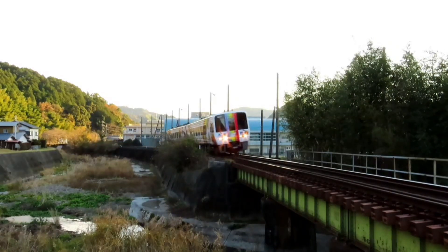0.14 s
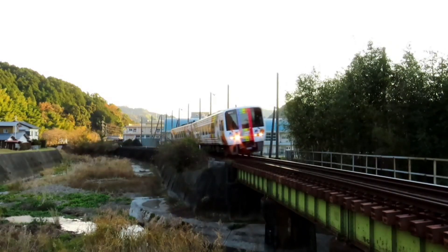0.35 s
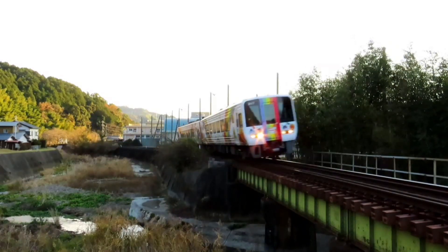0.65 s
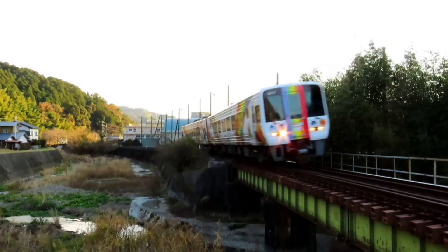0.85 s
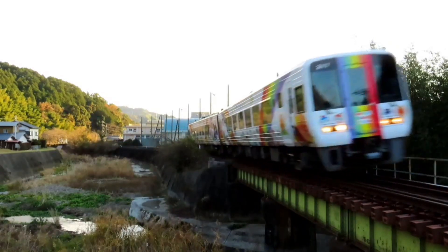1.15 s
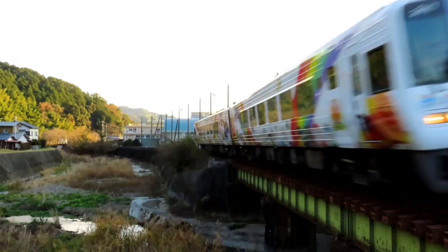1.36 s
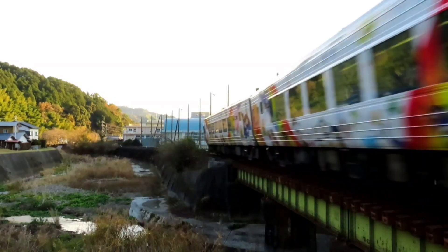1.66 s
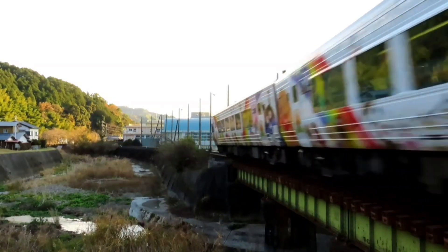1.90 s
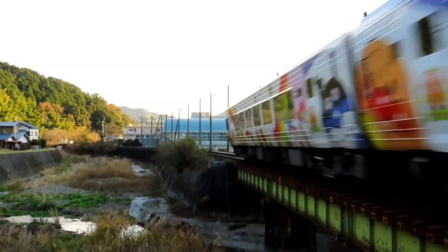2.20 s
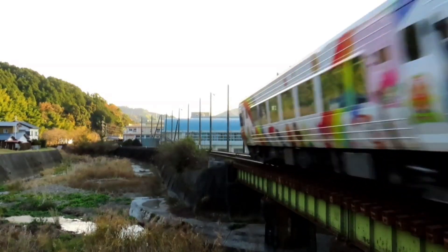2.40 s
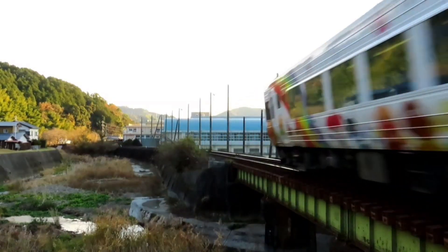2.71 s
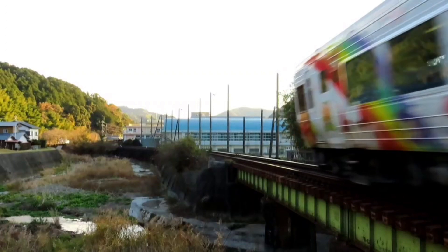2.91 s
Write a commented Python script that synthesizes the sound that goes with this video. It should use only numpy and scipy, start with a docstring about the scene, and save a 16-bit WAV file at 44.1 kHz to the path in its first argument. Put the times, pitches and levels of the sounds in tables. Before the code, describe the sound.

Diesel train rumbling across a steel bridge close by, with rhythmic wheel clacks.

```python
"""A diesel drone and a swelling steel roar: a railcar set runs onto a short girder bridge and
passes close by, off to the right. Rough rail shakes the girders under the rolling wheels, and
single modes sing out over the engine's low firing tones. Once a turn a wheel thumps the rail,
clacking and setting the girders ringing. A thin hiss sits on top. Two close microphones hear
the train with short echoes off banks and cars, and a limiter ducks the loudest blows."""
import sys
import numpy as np
from scipy import signal
from scipy.fft import rfft, irfft, next_fast_len
from scipy.io import wavfile
from scipy.ndimage import uniform_filter1d

SR = 44100
rng = np.random.default_rng(int(sys.argv[2]) if len(sys.argv) > 2 else 0)


def master(y):
    """Save y as 16-bit WAV."""
    cut = np.clip(np.atleast_2d(y).T, -1, 1)
    pcm = np.round(cut * 32767)  # scale
    wavfile.write(sys.argv[1], SR, pcm.astype(np.int16))


N = 134505
TIME_S = np.arange(N) / SR
OPPOSITE = np.array([[1], [-1]])   # left and right in opposite polarity


def amp(db):
    """Decibels to amplitude."""
    return 10 ** (np.asarray(db) / 20)


def unit_rms(x):
    """Scale to an RMS of one."""
    return x / np.sqrt(np.mean(x ** 2) + 1e-20)


def automation(rows):
    """One curve per column, gliding between rows that start with a time."""
    times, *columns = np.transpose(rows)
    return [np.interp(TIME_S, times, column) for column in columns]


def at_hz(points, hz):
    """Read a curve along a log frequency axis."""
    freqs, values = np.transpose(points)
    return np.interp(np.log(hz + 1), np.log(freqs + 1), values)


def shape(x, response):
    """Filter by a function of frequency."""
    size = next_fast_len(N + 8192)
    freqs = np.arange(size // 2 + 1) * SR / size
    return irfft(rfft(x, size) * response(freqs), size)[..., :N]


def eq_band(x, eq, low, high, slope):
    """Apply an EQ curve and keep one soft-edged band."""
    def response(f):
        below_high = 1 / (1 + (f / high) ** slope)
        below_low = 1 / (1 + (f / low) ** slope) if low else 0
        return amp(at_hz(eq, f)) * np.sqrt(below_high - below_low)
    return shape(x, response)


def drift(rate_hz):
    """Slow random wander with an RMS of about one."""
    r = np.exp(-80 * np.pi * rate_hz / SR)   # one step every 40 samples
    slow = signal.lfilter([1], [1, -2 * r, r * r], rng.standard_normal(N // 40 + 2002))[2000:]
    return np.interp(np.arange(N) / 40, np.arange(len(slow)), unit_rms(slow))


def resonance(x, hz, width_hz):
    """One ringing band-pass mode."""
    r = np.exp(-np.pi * width_hz / SR)
    gain = (1 - r * r) / 2
    return signal.lfilter([gain, 0, -gain], [1, -2 * r * np.cos(2 * np.pi * hz / SR), r * r], x)


def noise_tone(white, hz, width_hz):
    """Noise narrowed to a rough tone by two resonances in a row."""
    return resonance(resonance(white, hz, width_hz), hz, width_hz)


# Phase gap between the microphones, source ahead or on the right: freq_hz, left_lead_rad
PHASE_AHEAD = [(100, 0), (6000, -.05), (9000, -.8), (14000, -2.6)]
PHASE_RIGHT = [(100, 0), (600, -.1), (1300, -.25), (2760, -.3), (4050, -.7), (5430, -1.5), (7580, -2.3),
               (9560, -2.9), (14000, -3.0)]
# Level gap for the same two positions: freq_hz, left_over_right_db
BALANCE_AHEAD = [(60, 0), (370, -.2), (2000, -.5), (8000, 0)]
BALANCE_RIGHT = [(60, 0), (200, -.6), (670, -2.4), (1500, -3), (4140, -2), (8000, -.5)]
def mic_pair(x, pan):
    """Two close microphones hear one source with a phase and level gap; pan 0 is ahead, 1 right."""
    def heard(phase, balance):
        half = OPPOSITE / 2
        return shape(x, lambda f: np.exp(1j * half * at_hz(phase, f)) * amp(half * at_hz(balance, f)))
    return (1 - pan) * heard(PHASE_AHEAD, BALANCE_AHEAD) + pan * heard(PHASE_RIGHT, BALANCE_RIGHT)


# Echo return EQ: freq_hz, gain_db
ECHO_EQ = [(30, -24), (60, -30), (200, -27), (400, -23), (1200, -23), (2500, -18), (5000, -10), (14000, -8)]
def bank_echoes(x, t60_s=0.35):
    """Short diffuse echoes off banks and cars, opposite in the two microphones."""
    tail = rng.standard_normal(16000) * amp(-60 * TIME_S[:16000] / t60_s)
    wet = signal.fftconvolve(x, tail / np.linalg.norm(tail))[:N]
    return shape(wet, lambda f: amp(at_hz(ECHO_EQ, f))) * OPPOSITE


# Hiss fader: time_s, level_db
HISS_FADER = [(0, -47), (.2, -44), (1.15, -46), (1.4, -55), (2.1, -53), (2.5, -65), (3.05, -69)]
# Hiss colour: freq_hz, gain_db
HISS_EQ = [(8000, -24), (11000, -14), (12500, -9), (13500, -6), (14150, 0), (14400, -2)]
# Faint whistles in the hiss: pitch_hz, relative_db, width_hz
HISS_TONES = [(14185, -4, 24), (13920, -13, 50)]
def top_hiss(wide_db=9, tones_end_s=1.75, fade_s=0.3):
    """Thin, wide hiss above 8 kHz, with two faint tones that fade out partway."""
    white = rng.standard_normal((3, N))
    mid, side = shape(white[:2], lambda f: amp(at_hz(HISS_EQ, f)) * (f > 8000))
    tones = sum(amp(db) * unit_rms(noise_tone(white[2], hz, width)) for hz, db, width in HISS_TONES)
    tones *= np.clip((tones_end_s - TIME_S) / fade_s + 1, 0, 1)
    wide = unit_rms(side) * OPPOSITE + mic_pair(tones, pan=0)
    level_db, = automation(HISS_FADER)
    return amp(level_db) * (unit_rms(mid) + amp(wide_db) * wide)


# The engine as it nears and leaves: time_s, firing_hz, level_db
ENGINE_PASS = [(0, 83.4, -26.5), (.24, 83.43, -21), (.34, 84.4, -27), (.7, 85.1, -21), (.85, 85.6, -33),
               (1.05, 86.3, -28), (1.3, 84.66, -28), (2.0, 84, -35.5), (3.05, 81.9, -38)]
# Partials of the drone: firing_multiple, relative_db
ENGINE_PARTIALS = [(.5, -17.5), (1, 3), (1.5, -16), (2, -2.5), (2.5, -28), (4, -28), (9, -12)]
def diesel_drone(waver_db=1.2):
    """Low firing orders of the diesel, each wavering in level."""
    firing_hz, level_db = automation(ENGINE_PASS)
    phase = 2 * np.pi * np.cumsum(firing_hz) / SR
    drone = sum(amp(db + waver_db * drift(6.9)) * np.sin(multiple * phase + 6.7 * rng.random())
                for multiple, db in ENGINE_PARTIALS)
    return np.sqrt(2) * amp(level_db) * drone


# Singing steel cues: start_s, end_s, pitch_hz, level_db, width_hz
WHINE_CUES = [(0.567, .71, 1000, -19, 50), (0.465, .54, 1020, -23, 72), (0.73, 0.64, 940, -35, 21),
              (0.573, .63, 1150, -21, 60), (0.572, .63, 308, -13.5, 18), (0.77, 0.83, 300, -15, 30),
              (0.535, 1.3, 320, -25.5, 16), (1.2, 1.245, 388, -12, 42), (0.687, 0.717, 1750, -21.5, 360),
              (1.03, 1.56, 172, -19.5, 21), (0.978, 1.83, 98.8, -24.5, 12.7), (2.05, 2.7, 99, -27.5, 21),
              (1.91, 2.5, 173.3, -28, 14), (2.31, 2.36, 360, -13.5, 35), (2.41, 2.425, 320, -17.5, 50),
              (2.445, 2.46, 340, -13.5, 39.5), (2.52, 2.53, 371, -16.5, 60), (2.755, 2.8, 375, -19.5, 70),
              (0.578, 0.64, 1310, -19.5, 190), (0.2, 0.225, 480, -20, 59), (1.41, 1.435, 570, -17, 82),
              (0.01, .5, 750, -34.5, 33), (1.02, 1.05, 324, -14, 45), (1.85, 1.875, 372, -16.5, 55),
              (0.76, 0.82, 1030, -20, 130), (.89, .95, 1060, -24, 130)]
def steel_whines(fade_s=0.02):
    """Girder or rail modes sing out for a while as narrow, rough tones."""
    out = 0
    for start, end, hz, db, width in WHINE_CUES:
        gate = np.clip(np.minimum(TIME_S - start, end - TIME_S) / fade_s + 1, 0, 1)
        tone = gate * noise_tone(rng.standard_normal(N), hz, width)
        out += amp(db) * unit_rms(tone) * np.sqrt(np.mean(gate ** 2))
    return out


# Roar faders, low band to high:
# time_s, ground_shake_db, rumble_db, girder_boom_db, girder_roar_db, rail_ring_db, clatter_db, hiss_db
ROAR_FADERS = [(0, -31, -31.5, -35.5, -32, -37, -34.5, -50), (.18, -42, -22, -38.5, -27.5, -49, -25.5, -41),
               (.3, -35, -27.5, -31, -26, -32, -27, -42), (.44, -34, -17, -36, -24, -34, -28.5, -40.5),
               (.58, -28, -26, -14, -29.5, -22, -26, -38.5),
               (.74, -24.5, -23.5, -21.5, -15.5, -19.5, -25.5, -39),
               (.95, -34, -22, -16.5, -24.5, -19, -29.5, -42.5),
               (1.19, -43, -21, -21, -17, -25.5, -25, -40),
               (1.28, -47, -26, -19, -22.5, -28.5, -31.5, -41.5),
               (1.5, -46, -33, -19.5, -20, -25.5, -31, -41),
               (1.851, -39, -23, -25, -20.5, -25.5, -27.5, -39),
               (2.08, -38, -29, -22.5, -31, -27, -29, -40),
               (2.23, -41, -20, -27.5, -22.5, -28, -27.5, -36.5),
               (2.5, -45, -36, -21, -22.5, -32, -31.5, -41), (2.68, -47, -38, -29.5, -27.5, -33, -36, -44),
               (2.79, -46, -24, -23, -24.5, -38, -32.5, -45),
               (2.92, -42, -28.5, -37.5, -34, -35, -34.5, -41), (3.05, -42, -44, -37, -32.5, -42, -35, -44)]
# Splits between those bands: crossover_hz
ROAR_CROSSOVERS = (65, 240, 450, 850, 1500, 3500)
# Roar colour within the bands: freq_hz, gain_db
ROAR_EQ = [(18, -45), (30, -14), (53, -8.5), (91, 0.5), (137, 8.5), (173, 0), (243, -2.5), (339, 1),
           (699, -8), (1030, -13.5), (1860, -23), (5360, -40.5), (14300, -45)]
# Girder and rail resonances: pitch_hz, width_hz, rolling_db, thumped_db
GIRDER_MODES = [(108, 22, -16.5, 19), (173, 8.6, -1, 15), (201.7, 28, -7, -29), (305.2, 12, -9.5, -1),
                (335.6, 6.1, -6, -22.5), (383.2, 19, -1.5, 5.5), (466, 8.4, -11, 0), (554.3, 8.9, -1.5, 14),
                (620, 8.3, -8, 5), (823, 135, -19, 7), (1017, 15, -9, 6), (1089, 11.7, 5.5, -6),
                (1264, 18, -5, -4), (1870, 38, -35, 8)]
def girder_roar(bumps_per_s=3500, bump_spread_db=2.5, wander_db=4.5, flutter_db=1.44):
    """Small rail bumps shake the girders: a broad roar whose resonances swell and sink."""
    bumps = (rng.random(N) < bumps_per_s / SR) * amp(bump_spread_db * rng.exponential(1, N))
    bumps *= rng.choice([-1, 1], N)
    roughness = unit_rms(bumps) + 1.12 * rng.standard_normal(N)
    steel = 0.85 * roughness
    for k, (hz, width, rolling_db, _) in enumerate(GIRDER_MODES):
        steel += (-1) ** k * amp(rolling_db + wander_db * drift(3.4)) * resonance(roughness, hz, width)
    edges, out = (0, *ROAR_CROSSOVERS, SR), 0
    for low, high, db in zip(edges, edges[1:], automation(ROAR_FADERS)):
        band = eq_band(steel, ROAR_EQ, low, high, slope=8)
        out += amp(db + flutter_db * drift(10.4)) * unit_rms(band)
    return out


# Bright accents on the wheel hits: start_s, level_db, centre_hz
TICK_CUES = [(0.2048, -10, 2300), (0.298, -20, 4300), (0.592, -26, 1500), (0.6894, -16, 1800),
             (0.795, -17, 1300), (0.898, -17, 1500), (1.2084, -14, 3000), (1.312, -19, 1600),
             (1.405, -12, 1100), (1.922, -19, 1800), (2.304, -16, 1500), (2.408, -20, 3000),
             (2.5122, -18.5, 2600), (2.7296, -21.5, 3600)]
def steel_ticks(trim_db=-10, t60_s=0.07, edge_ratio=1.47):
    """Short bursts of band noise put a steel edge on the sharpest clacks."""
    age_s, out = TIME_S[:SR // 8], np.zeros(N + SR)
    for start_s, db, hz in TICK_CUES:
        band = signal.butter(2, [hz / edge_ratio, hz * edge_ratio], "band", fs=SR, output="sos")
        burst = unit_rms(signal.sosfilt(band, rng.standard_normal(len(age_s))))
        at = int(start_s * SR)
        out[at:at + len(age_s)] += amp(db + trim_db - 60 * age_s / t60_s) * burst
    return out[:N]


# Ring of the wheel on the rail: pitch_hz, relative_db, t60_s
WHEEL_MODES = [(311, -16, 0.099), (500, -15, 0.0046), (740, 4, 0.02), (1124, 8, 0.0095), (1990, 1, 0.0096),
               (2790, -20.5, 0.0087), (4350, -23, 0.015)]
def wheel_clacks(start_s, level_db, trim_db=-13.5, touch_gap_s=0.0035):
    """Three quick touches per hit strike the wheel's modes, each with its own strength."""
    delay_s = touch_gap_s * (np.arange(3) + rng.uniform(0, 0.637, (len(start_s), 3)))
    at = ((start_s[:, None] + delay_s) * SR).astype(int)
    out = 0
    for hz, mode_db, t60_s in WHEEL_MODES:
        touch_db = level_db[:, None] + trim_db + mode_db + rng.normal(0, 1.06, at.shape)
        clicks = np.full(N, 1e-18)
        clicks[at] = amp(touch_db) * rng.choice([-1, 1], at.shape)
        r, w = amp(-60 / (t60_s * SR)), 2 * np.pi * hz / SR
        out += signal.lfilter([0, np.sin(w)], [1, -2 * r * np.cos(w), r * r], clicks)
    return out


# Thump colour: freq_hz, gain_db
THUMP_EQ = [(60, -22), (150, -3.5), (350, 5.5), (800, -4.5), (1600, -9), (3200, -22.5), (6400, -38),
            (14000, -35.5)]
# Wheel hits on the rail: start_s, level_db, brightness_db, hold_s, clack_db, thud_db
WHEEL_HITS = [(0.118, -12, -13, 0.004, -10, 6), (0.198, -5.5, 0.5, 0.008, -7, 4),
              (0.3, -26, -2, 0.012, -7, -3), (0.39, -26.5, -15, 0.0097, -7, -3),
              (0.497, -17, -1.5, 0.01, -20, -3), (0.589, -12, -2, 0.014, 8.5, -8),
              (0.692, -8, -3, 0.018, 5, -5), (0.786, -0.5, -10.5, 0.0066, -1, -8),
              (0.9, -8, 0, 0.018, 5.5, -1), (0.999, -5.5, -3, 0.014, 1.5, -3),
              (1.105, -12.5, 4.5, 0.019, -10, 0), (1.194, -3, -3, 0.03, -1, 1),
              (1.309, -6, -1, 0.03, 4, -7), (1.401, -4, -6.5, 0.01, 3, -9),
              (1.505, -7.5, -3.5, 0.021, -9, -3), (1.614, -8.5, 0, 0.011, 4.5, 4),
              (1.726, -4.5, -2.5, 0.016, 0, 1), (1.819, -3.5, 1, 0.011, -7, -11),
              (1.847, 2.5, -9, 0.008, -7, -7.5), (1.917, -7.5, 2, 0.0084, 0, 2),
              (2.027, -14.5, 5.5, 0.013, 6, -8), (2.149, -7, -9.5, 0.01, -13, -2),
              (2.203, -5, -5, 0.015, 3, 3), (2.301, -4, -3, 0.0053, 4, -7), (2.4, -11, 3, 0.024, -5, -18),
              (2.51, -5.5, -3.5, 0.011, -6, 2), (2.615, -2.5, -3.5, 0.0072, -1.5, -8),
              (2.727, -11, 0, 0.02, 4, -12), (2.834, -15, 2.5, 0.0094, 4, -13),
              (2.956, -32, 16.5, 0.011, -7, -3)]
def wheel_thumps(trim_db=-11.5, ring_db=-6, attack_s=0.0036, t60_s=0.099, vary_db=3.5, smear_s=0.002):
    """A wheel hits the rail once a turn: a burst of rattle that rings the girders, and a clack."""
    start_s, level_db, brightness_db, hold_s, clack_db, thud_db = np.transpose(WHEEL_HITS)
    edges_hz = (1, 250, 500, 900, 1600, 2800, 5000, SR)
    white = rng.standard_normal(N)
    white /= np.std(shape(white, lambda f: amp(at_hz(THUMP_EQ, f))))   # unit level after the EQ
    age_s, rattle = TIME_S[:SR // 4], 0
    attack = 1 - np.exp(-age_s / attack_s)
    for low, high in zip(edges_hz, edges_hz[1:]):
        # Each hit lands with its own strength and onset in every band.
        strength, lag = rng.standard_normal((len(start_s), 2)).T
        tone_db = brightness_db * (low >= 900) + thud_db * (high <= 250)
        band_db = level_db + trim_db + tone_db + vary_db * strength
        onsets = ((start_s + smear_s * np.abs(lag)) * SR).astype(int)
        power = np.zeros(N + SR)
        for at, db, hold in zip(onsets, band_db, hold_s):
            envelope = attack * amp(db - 60 * np.maximum(age_s - hold, 0) / t60_s)
            power[at:at + len(age_s)] += envelope ** 2
        rattle += np.sqrt(power[:N]) * eq_band(white, THUMP_EQ, low, high, slope=6)
    ring = sum(amp(thumped_db + 2.0 * drift(8.5)) * resonance(rattle, hz, width)
               for hz, width, _, thumped_db in GIRDER_MODES)
    return rattle + amp(ring_db) * ring + wheel_clacks(start_s, level_db + clack_db)


# The train's place in the picture: time_s, pan (0 ahead, 1 right)
TRAIN_PAN = [(0, 0.45), (1.0, 0), (1.5, 0.78), (3.05, 0.87)]
def scene():
    """Pan the train past the microphones, with a little more echo as it moves right."""
    train = girder_roar() + wheel_thumps() + steel_ticks() + diesel_drone() + steel_whines()
    pan, = automation(TRAIN_PAN)
    echo_db = -8.75 + 2.5 * pan
    return mic_pair(train, pan) + amp(echo_db) * bank_echoes(train) + top_hiss()


def record(dry):
    """A gentle limiter ducks after loud blows, peaks are rounded and the very top is cut."""
    threshold_db, duck_share, release_db_per_s = -15.5, 0.24, 21
    ceiling, cutoff_hz = 0.95, 14330
    power = uniform_filter1d(np.mean(dry ** 2, axis=0), size=400, origin=199)
    level_db = 10 * np.log10(power + 1e-12)
    release_db = release_db_per_s * TIME_S
    held_db = np.maximum.accumulate(level_db + release_db) - release_db   # jumps up, sinks slowly
    duck_db = duck_share * np.maximum(held_db - threshold_db, 0)
    ducked = dry * amp(-uniform_filter1d(duck_db, size=200, origin=99))
    rounded = ceiling * np.tanh(ducked / ceiling)
    return signal.sosfilt(signal.ellip(14, .1, 90, cutoff_hz, fs=SR, output="sos"), rounded)


dry = scene()
out = record(dry)
master(out)
```